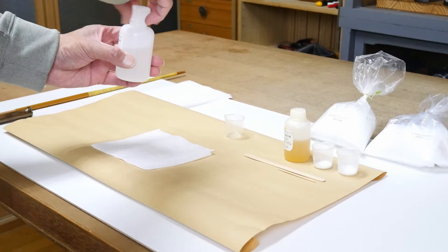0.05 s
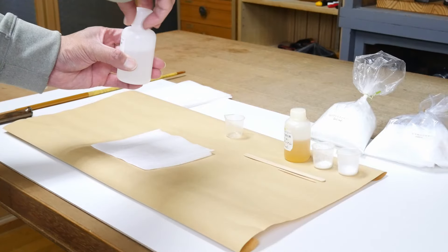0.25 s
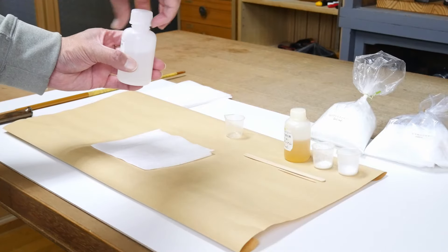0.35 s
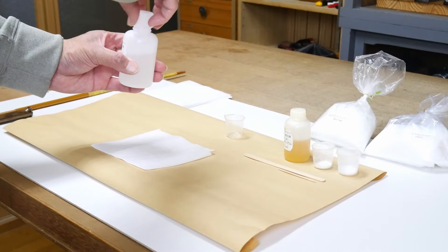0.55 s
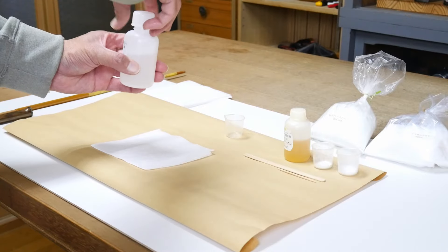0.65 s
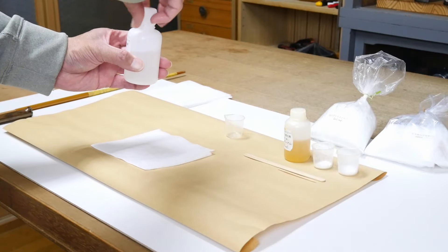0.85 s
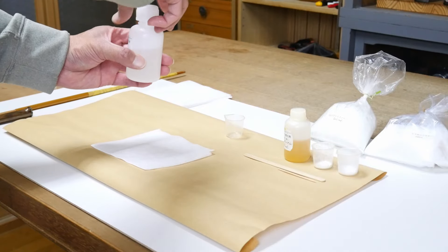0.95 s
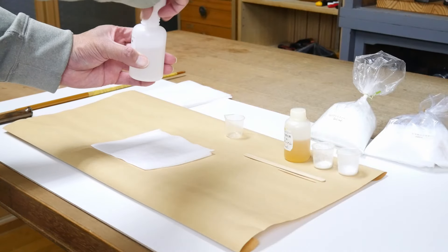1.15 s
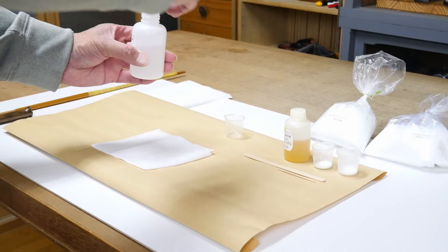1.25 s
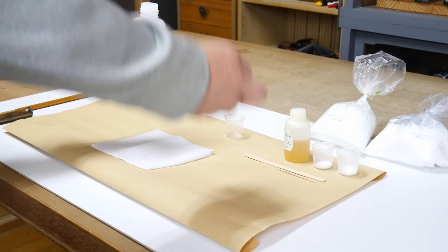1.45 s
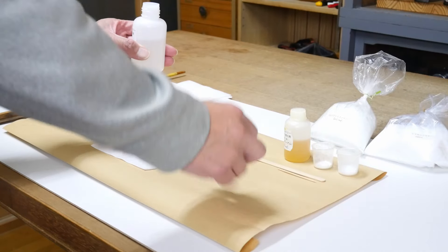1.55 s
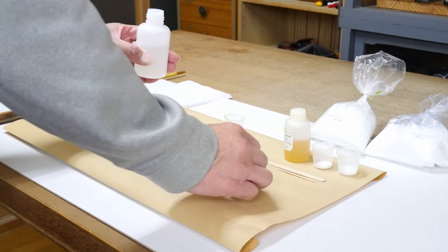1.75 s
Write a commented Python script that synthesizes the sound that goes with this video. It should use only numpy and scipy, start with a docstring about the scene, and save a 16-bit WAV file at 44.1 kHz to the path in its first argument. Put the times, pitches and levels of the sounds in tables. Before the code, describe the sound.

Sharp clicks come from a plastic bottle cap sticking and slipping as it is unscrewed in a small, quiet workshop. Soft sleeve movement and a faint tap on paper follow, nearly all heard on the right.

```python
"""A small plastic cap is twisted off a bottle at a workbench: it sticks and lets go in sharp clicks
that ring cap and bottle for a few ms. The bench top and a small dry room answer. Then a sleeved arm
swings forward with a soft rumble and lays the cap on paper. Faint rubs and a low room tone lie
underneath. Nearly all the sound is in the right channel; the left carries little but hiss."""
import sys
import numpy as np
from scipy import signal
from scipy.fft import rfft, irfft, next_fast_len
from scipy.io import wavfile
from scipy.ndimage import uniform_filter1d

SR = 44100
rng = np.random.default_rng(int(sys.argv[2]) if len(sys.argv) > 2 else 0)


def output_pcm(signal):
    """Save a mono or channel-first signal as 16-bit PCM at the path in sys.argv[1].

    Samples are clipped to [-1, 1] before scaling.
    """
    pcm = np.clip(np.atleast_2d(signal).T, -1, 1) * 32767
    wavfile.write(sys.argv[1], SR, np.round(pcm).astype(np.int16))


N = 79380


def amp(db):
    """Gain from dB."""
    return 10 ** (np.asarray(db) / 20)


def unit(x):
    """Scaled to rms 1."""
    return x / np.sqrt(np.mean(x ** 2) + 1e-20)


def along(points, hz):
    """A curve of (f/Hz, value) points, read on a log frequency axis."""
    f, v = np.transpose(points)
    return np.interp(np.log(hz + 1), np.log(f + 1), v)


def filtered(x, response):
    """Zero-phase EQ; response gives the gain at each frequency."""
    n = x.shape[-1]
    padded = next_fast_len(n + 8192)
    return irfft(rfft(x, padded) * response(np.fft.rfftfreq(padded, 1 / SR)), padded)[..., :n]


def noise(spectrum, size):
    """Noise of rms 1, coloured by (f/Hz, level/dB) points."""
    return unit(filtered(rng.standard_normal(size), lambda hz: amp(along(spectrum, hz))))


def fade(t, t60):
    """Exponential decay, 60 dB down after t60 seconds."""
    return np.exp(-np.log(1000) * t / np.maximum(t60, 1e-4))


def add(track, start, x):
    """Mix x into the track from start, in seconds."""
    i = max(round(start * SR), 0)
    track[i:i + len(x)] += x[:max(len(track) - i, 0)]


def pulse(gain, size):
    """The tightest transient (minimum phase) with the given gain against frequency."""
    cepstrum = irfft(np.log(gain(np.fft.rfftfreq(size, 1 / SR)) + 1e-6), size)
    cepstrum[1:size // 2] *= 2
    cepstrum[size // 2 + 1:] = 0
    return irfft(np.exp(rfft(cepstrum)), size)


def room_tone():
    """The workshop's bed: drifting rumble, airy noise and a faint hum."""
    # Hum tones: f/Hz, level/dB
    hum_tones = [(118.4, -64), (301.5, -62.5)]
    # Slow drift of the rumble: t/s, level/dB
    rumble_drift = [(0, -1.5), (.35, 0), (.47, 0.5), (.62, -1), (.82, 1.5), (.92, -1.5), (1.17, -2),
                    (1.35, 0.5), (1.8, -0.5)]
    # Spectra of the rumble and the air: f/Hz, level/dB
    rumble_spectrum = [(15, -11), (28, -2), (60, -3), (110, -3.5), (200, -8.5), (300, -14), (450, -17),
                       (700, -26), (1100, -35), (2500, -52.5), (8000, -66)]
    air_spectrum = [(300, -13), (900, -8), (1500, -0.5), (2500, 0), (5000, -2), (9000, -3), (15500, -9)]
    t = np.arange(N) / SR
    hum = sum(amp(db) * np.sqrt(2) * np.sin(2 * np.pi * (hz * t + rng.random())) for hz, db in hum_tones)
    drift_db = np.interp(t, *np.transpose(rumble_drift))
    rumble = amp(-49 + drift_db) * noise(rumble_spectrum, N)
    air = amp(-56) * noise(air_spectrum, N)
    return rumble + air + hum


def rubs():
    """Fingers, plastic and paper rub in faint grainy swishes as the cap is gripped and set down."""
    # Swishes: peak t/s, half-width/s, level/dB, centre f/Hz
    swishes = [(.015, 0.025, -52.5, 2640), (1.059, 0.0074, -58, 1960), (1.765, 0.079, -59, 3500)]
    t, track = np.arange(N) / SR, np.zeros(N)
    for peak, width, db, centre_hz in swishes:
        grain_db = -1.5 * unit(uniform_filter1d(rng.standard_normal(N), size=90))  # 2 ms grains
        friction = amp(grain_db) * rng.standard_normal(N)
        # The band is 6 dB down an octave either side of its centre.
        swish = filtered(friction, lambda f: 1 / (1 + np.log2((f + 1) / centre_hz) ** 2))
        track += amp(db) * unit(swish) * np.exp(-((t - peak) / width) ** 2)
    return track


def cap_clicks():
    """Stick-slip: each slip cracks and rings cap and bottle, then bench, wall and room answer."""
    # Slips: t/s, level/dB, pitch factor, length factor, room send/dB, then level/dB in each EQ band
    clicks = [ (0.2205, -37.5, 1.02, 0.86, 4.5, 11.5, -5.5, 2, -7.5, -8.5, -6, -20),
              (.3460, -33, 0.97, 0.75, -3.5, 1, 4.5, -2.5, 0.5, 1.5, -8, -12),
              (0.4685, -20, 0.96, 1.03, -1.5, -3, -6.5, 1.5, -0.5, 0.5, 2, -0.5),
              (0.4706, -29, 0.92, 1, 4.5, -8.5, 2, 4, 0.5, 0, -14, -16),
              (0.5572, -39.5, 0.996, 0.54, 2.5, 0, -2, 8, -5, -5, -7, 1),
              (0.729, -34, 0.88, 0.76, -1, 9, 3.5, 0, -1, 2, -1, 3),
              (0.7325, -20.5, 1.002, 0.87, -1, 2.5, 4, 1, 3, 2.5, 2, 5),
              (0.8364, -45, 0.86, .45, 1, -8, 5, 15, -6, -3, -9, -8),
              (1.0197, -40, 0.991, 0.77, 6, -15, -16, -10, -10.5, 0, -5.5, 18.5),
              (1.6865, -47.5, 0.94, 0.99, 4, -5, -2, -7.5, -10, 4, 10.5, 8),
              (1.7507, -50.5, 1.0, 0.64, 10, 10, 3.5, -8, -14.5, 2.5, 8, 2.5), ]
    # Bands of each click's EQ: f/Hz
    eq_bands = [1100, 1650, 2600, 4000, 5400, 8000, 11000]
    # Modes of cap and bottle: f/Hz, level/dB, t60/s
    modes = [(1190, -17, 0.021), (1695, -5, 0.01), (2470, 0, 0.0097), (2804, -0.5, 0.0097),
             (3386, -6, 0.01), (4306, 3.5, 0.0085), (4950, -4, 0.0088), (5396, 1.5, 0.011),
             (6540, -6, 0.0072), (7210, -4.5, 0.0086), (8000, -6, 0.008), (9230, -14.5, 0.0091),
             (11930, -23, 0.0074)]
    # Spectrum of the slip itself, under the ring: f/Hz, level/dB
    crack_spectrum = [(200, -13), (800, -12), (1600, 5), (5000, 4), (8000, -4), (11000, -10.5),
                      (15500, -16)]
    # Early reflections off the bench and the near wall: delay/s, level/dB
    reflections = [(.0098, -19), (0.0121, -28)]
    attack_s, direct_delay_s = 0.00036, 0.00037
    scatter_db, scatter_turns = 0.83, 0.16
    direct_crack, sideways_crack = amp(-11.5), amp(-0.5)  # against the ring; sideways feeds the room
    radiate_hz = 690  # so small a body radiates little below this
    t, track = np.arange(SR // 25) / SR, np.zeros(N)
    hz, mode_db, t60 = np.transpose(modes)[:, :, None]
    signs = (-1) ** np.arange(len(hz))[:, None]
    for start, db, pitch, length, send_db, *eq_db in clicks:
        eq = list(zip(eq_bands, eq_db))
        gains = signs * amp(mode_db + along(eq, hz) + scatter_db * rng.standard_normal(hz.shape))
        phases = scatter_turns * rng.standard_normal(hz.shape)
        partials = gains * np.sin(2 * np.pi * (hz * pitch * t + phases)) * fade(t, t60 * length)
        attack = 1 - np.exp(-t / (attack_s * length))
        ring = unit(partials.sum(axis=0) * attack)
        crack = unit(pulse(lambda f: amp(along(crack_spectrum, f) + along(eq, f)), len(t)))
        click = unit(ring + direct_crack * crack)
        gain = amp(db) / np.sqrt(10)  # the energy sits in about the first 4 of the 40 ms
        for delay, path_db in [(direct_delay_s, 0)] + reflections:
            add(track, start + delay, gain * amp(path_db) * click)
        reverb = signal.fftconvolve(ring, room()) + sideways_crack * signal.fftconvolve(crack, room())
        add(track, start, gain * amp(send_db) * reverb / np.hypot(1, sideways_crack))
    low_cut = signal.butter(2, radiate_hz, "highpass", fs=SR, output="sos")
    return signal.sosfilt(low_cut, track)


def room():
    """Impulse response of the small room: quick scatter off the bench clutter and a short tail."""
    # Decay of the tail: f/Hz, t60/s
    decay_times = [(500, 0.64), (2000, .22), (5500, 0.23), (10000, 0.25)]
    # Tone of the reverb: f/Hz, level/dB
    colour = [(300, 13.5), (900, -1), (1700, 4), (3500, -0.5), (5200, -1), (8000, 2.5), (11000, -5.5),
              (15000, -3)]
    hz, frame_times, bands = signal.stft(rng.standard_normal(SR // 2), SR, nperseg=256)
    decay = fade(frame_times, along(decay_times, hz)[:, None])
    tail = signal.istft(bands * decay * amp(along(colour, hz))[:, None], SR, nperseg=256)[1]
    t = np.arange(len(tail)) / SR
    onset = 1 - np.exp(-(t / 0.0044) ** 2)  # the echoes build over a few ms
    scatter = noise(colour, len(t)) * fade(t, t60=0.067)
    return (amp(-5.5) * unit(tail * onset) + amp(-12) * unit(scatter * onset)) / np.sqrt(len(t))


def sleeve():
    """Low cloth rumble that follows the arm's swing."""
    # Envelope of the swing: t/s, level/dB
    swing = [(1.15, -66), (1.23, -45), (1.32, -46.5), (1.40, -48), (1.437, -37.5), (1.465, -47.5),
             (1.6, -48.5), (1.68, -58), (1.8, -46)]
    # Spectrum of the moving cloth: f/Hz, level/dB
    cloth_spectrum = [(20, 13), (45, -40), (75, -2), (115, 4.5), (200, -4), (320, -10), (550, -29),
                      (1200, -43), (3000, -80)]
    swing_db = np.interp(np.arange(N) / SR, *np.transpose(swing))
    return amp(swing_db) * noise(cloth_spectrum, N)


def scene():
    """One microphone feeds the right channel, with a trace of bleed into the left."""
    mic = cap_clicks() + rubs() + sleeve() + room_tone()
    return np.array([amp(-50) * mic, mic])


def record(dry):
    """Each channel adds its own hiss; a brick-wall filter cuts the very top."""
    # Spectrum of the input hiss: f/Hz, level/dB
    hiss_spectrum = [(30, -1.5), (150, 0), (330, -1), (550, -6), (950, -13.5), (1500, -5.5), (2500, -1),
                     (5000, 1), (10000, 0.5), (15500, -0.5)]
    hiss = amp(-58) * np.array([noise(hiss_spectrum, N), noise(hiss_spectrum, N)])
    return filtered(dry + hiss, lambda hz: hz < 15850)


dry = scene()
out = record(dry)
output_pcm(out)
```